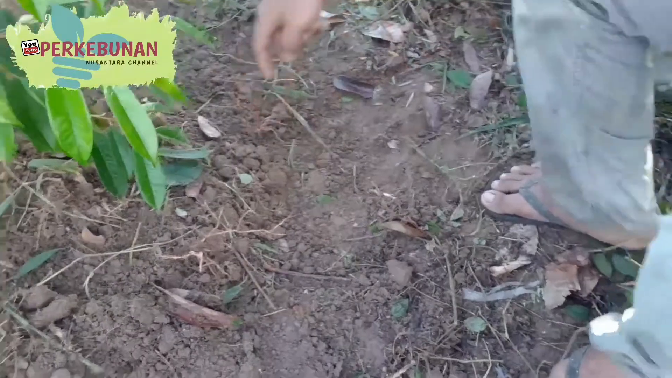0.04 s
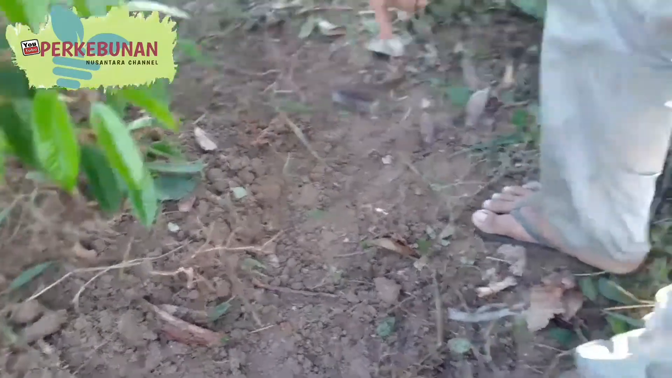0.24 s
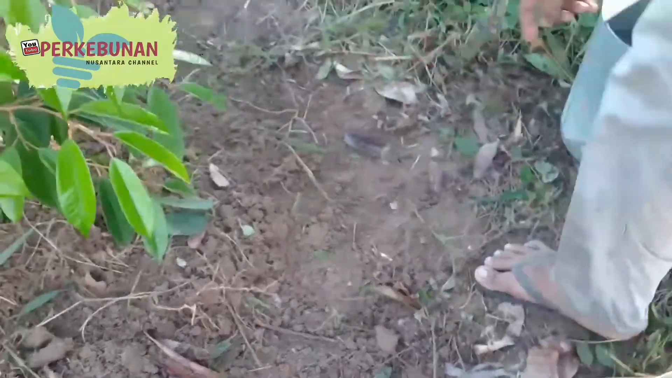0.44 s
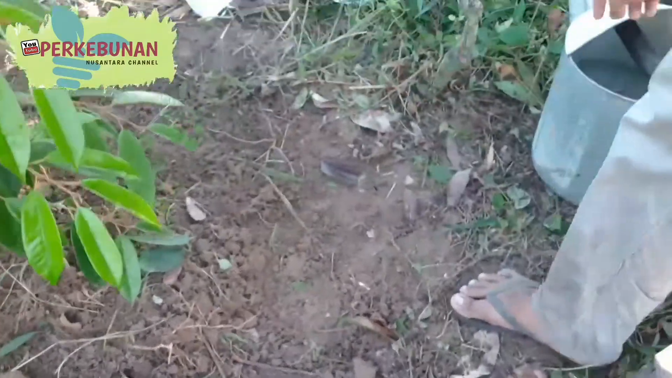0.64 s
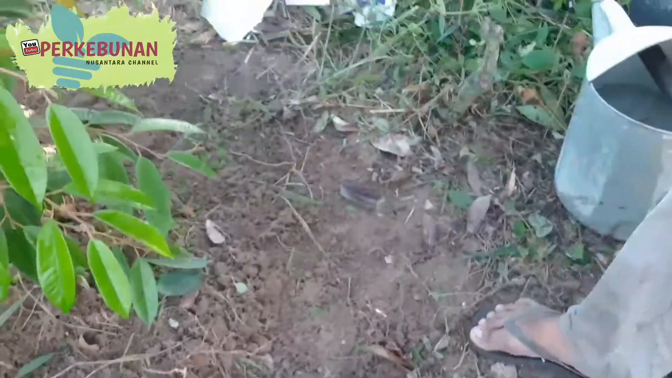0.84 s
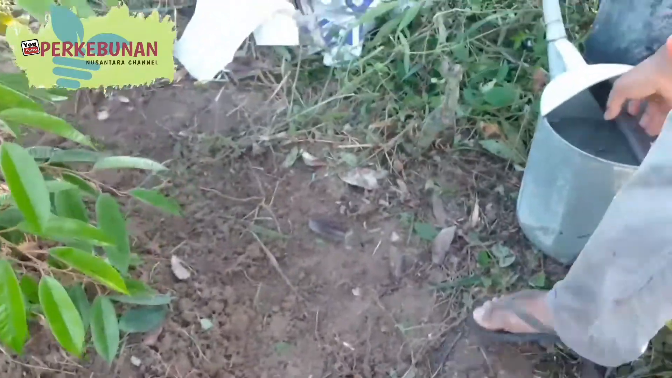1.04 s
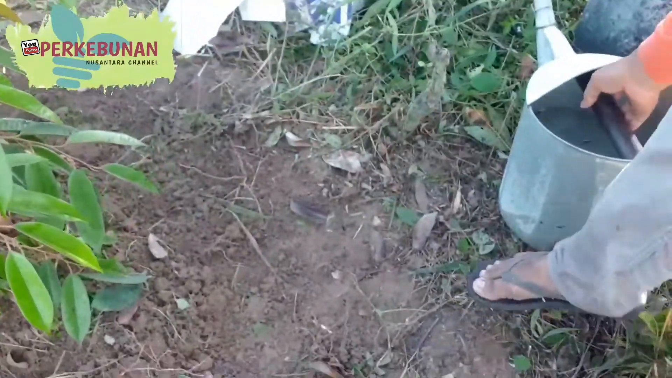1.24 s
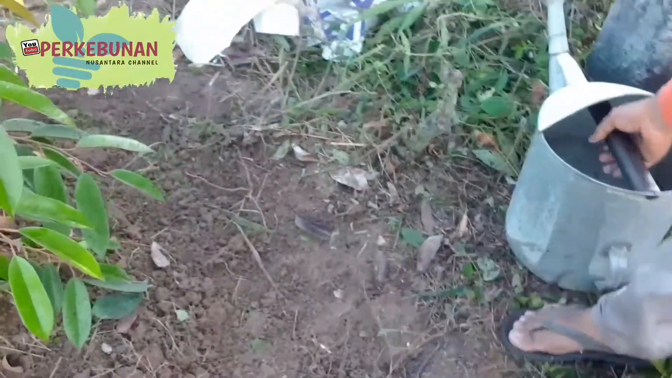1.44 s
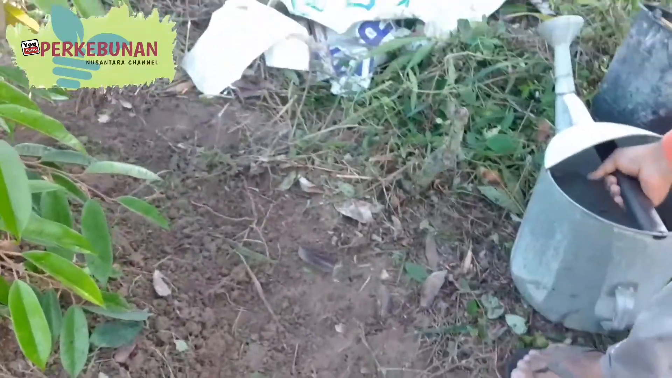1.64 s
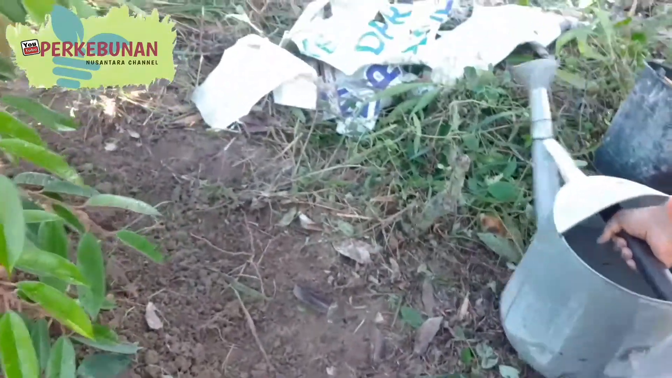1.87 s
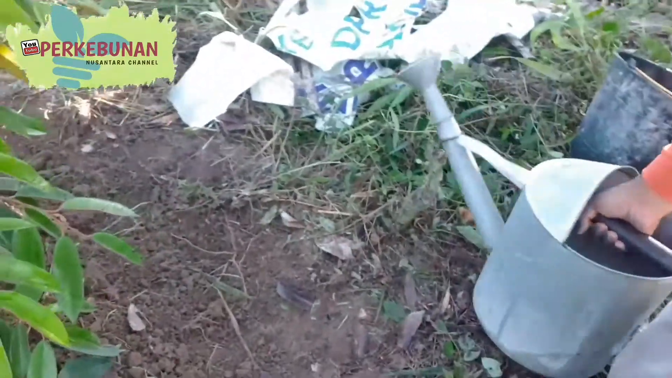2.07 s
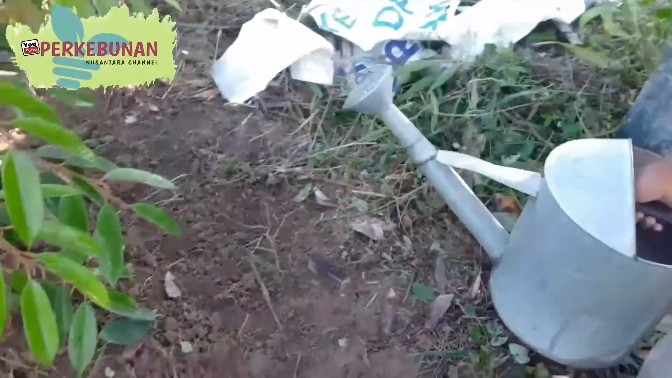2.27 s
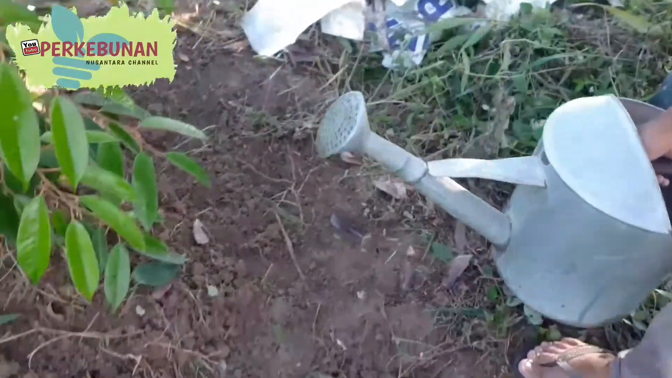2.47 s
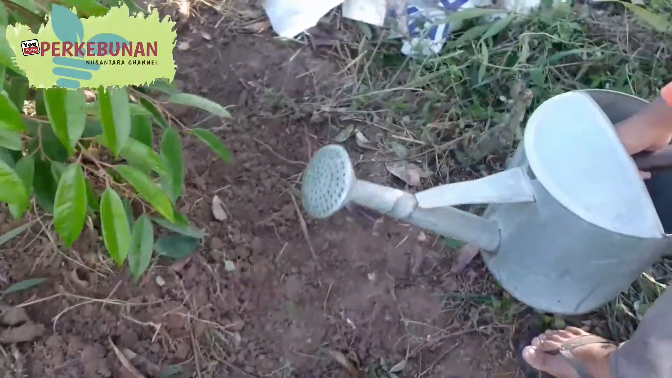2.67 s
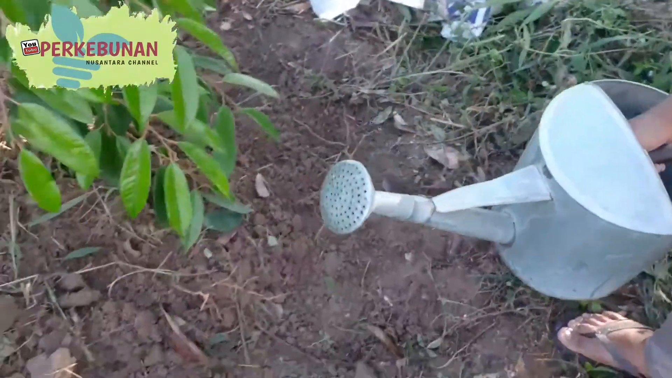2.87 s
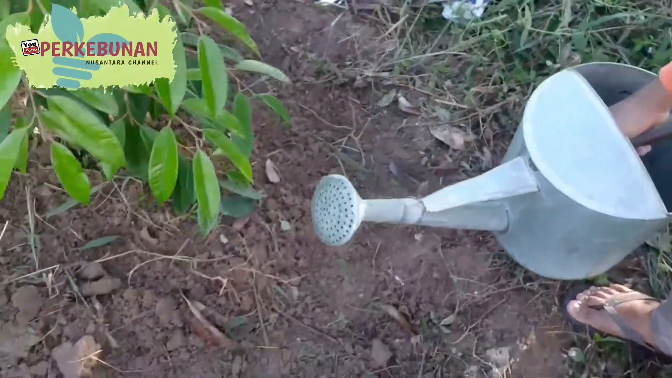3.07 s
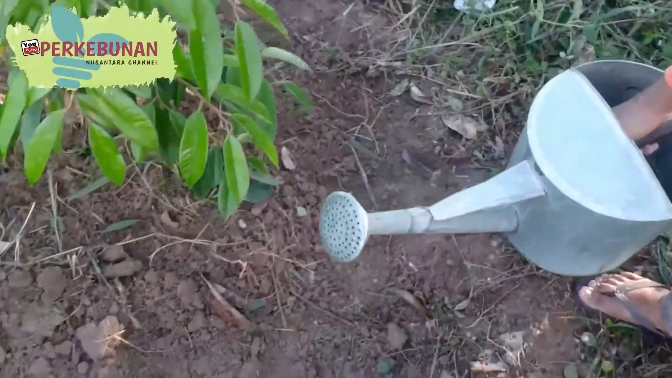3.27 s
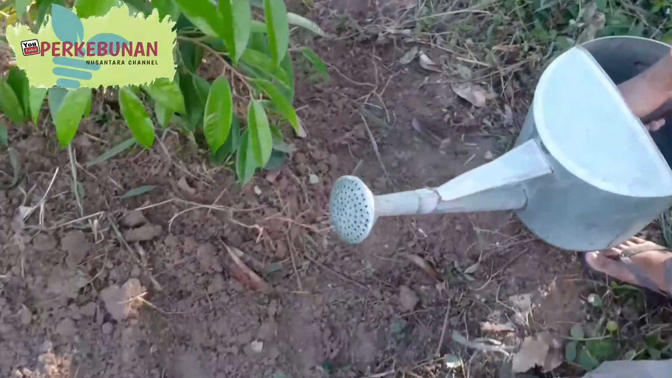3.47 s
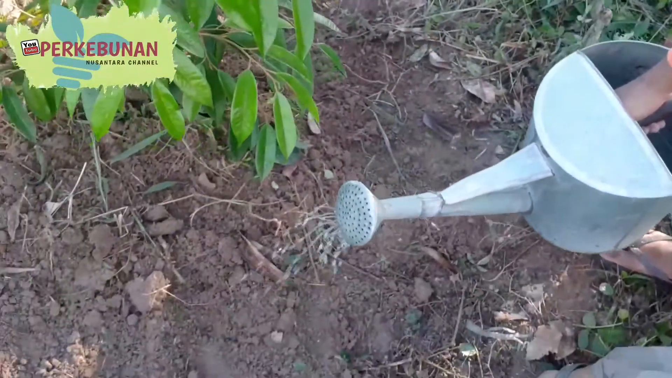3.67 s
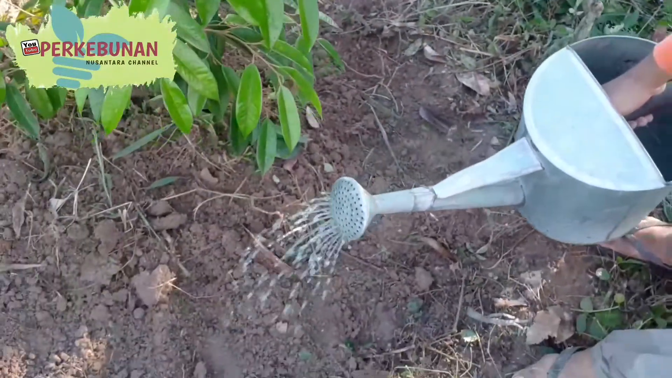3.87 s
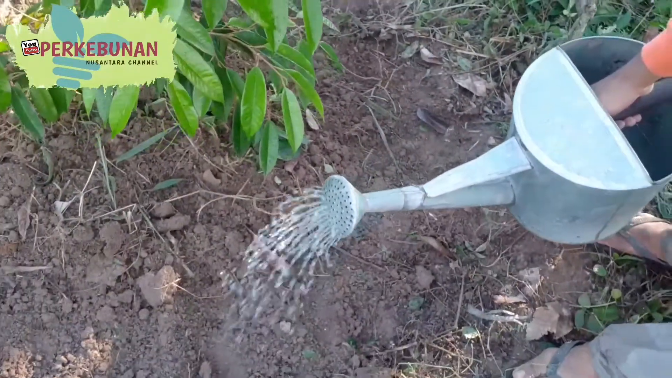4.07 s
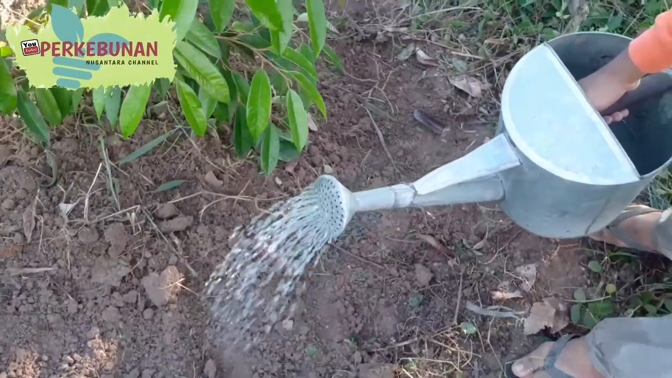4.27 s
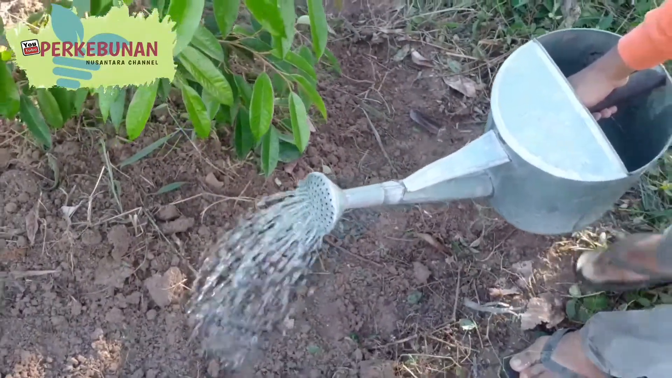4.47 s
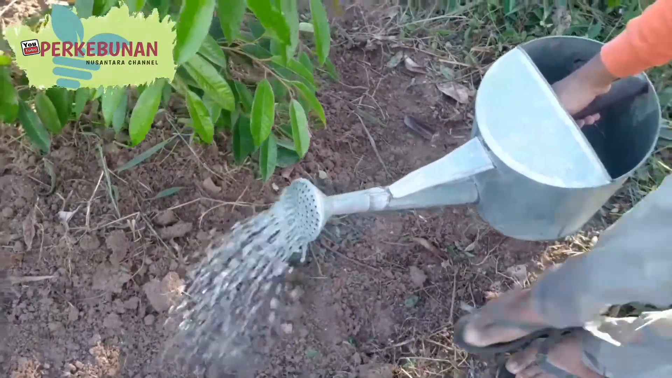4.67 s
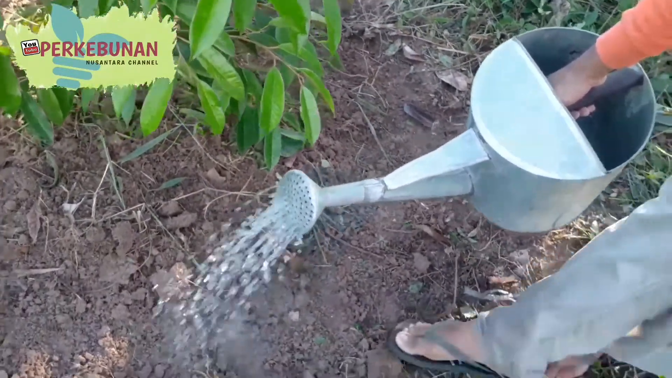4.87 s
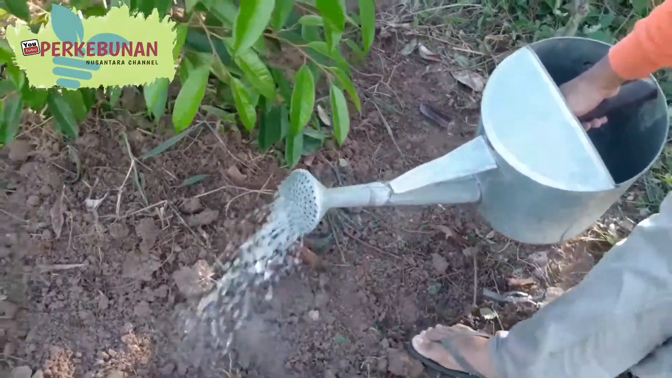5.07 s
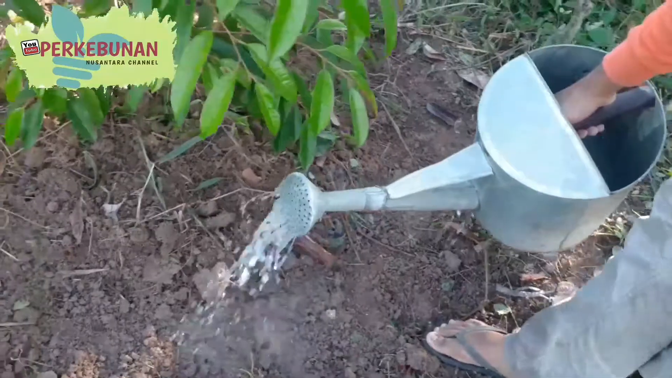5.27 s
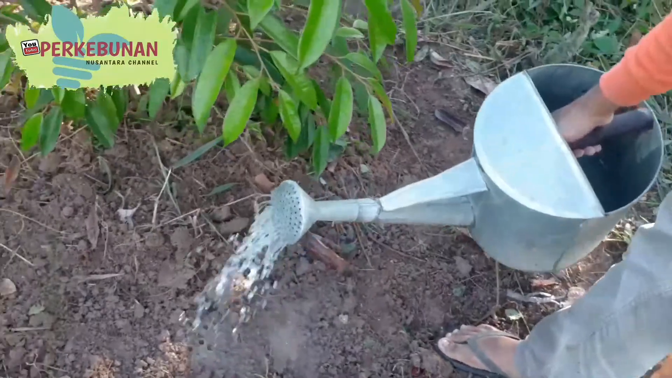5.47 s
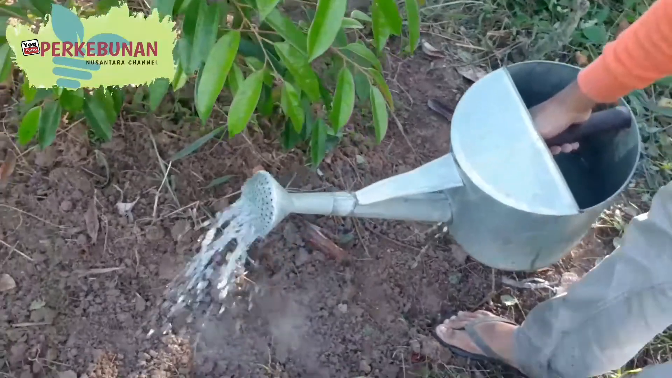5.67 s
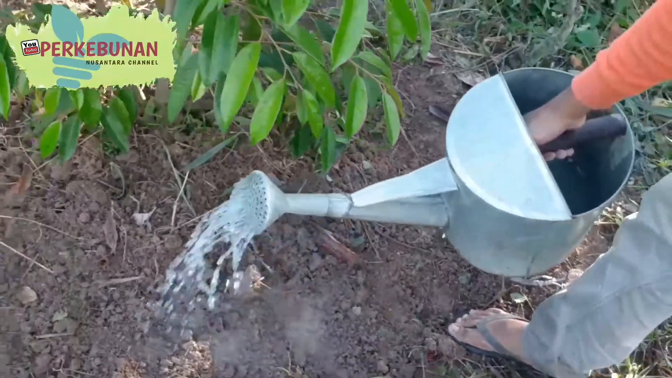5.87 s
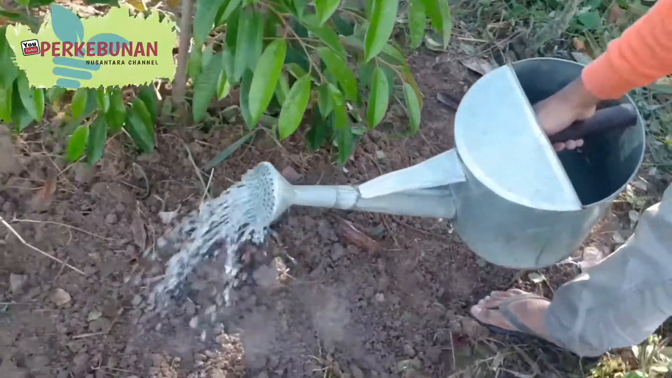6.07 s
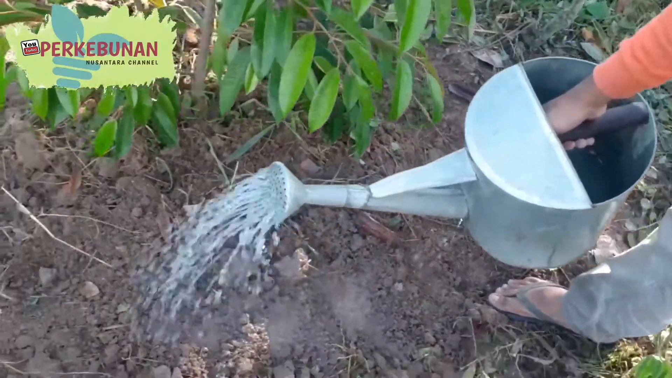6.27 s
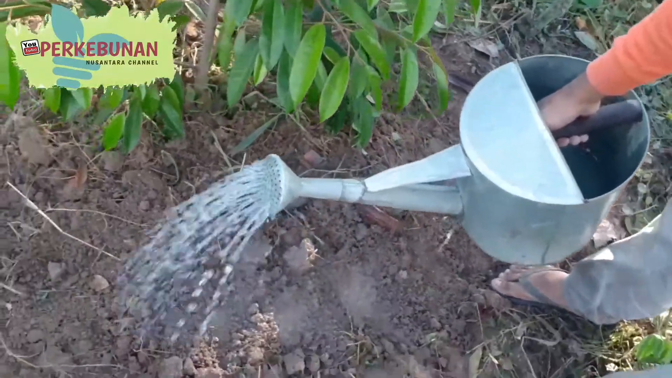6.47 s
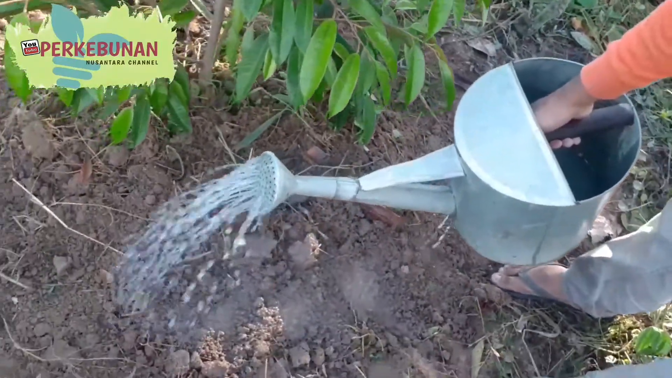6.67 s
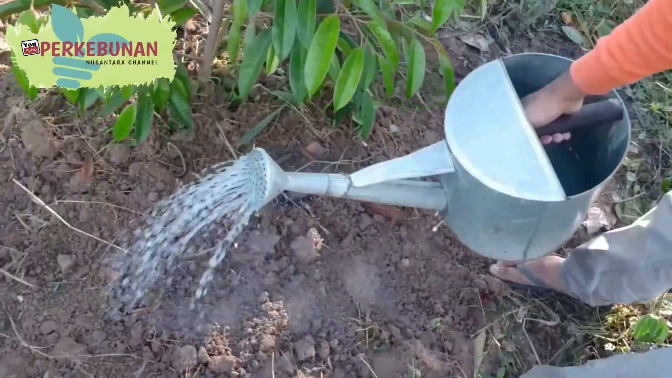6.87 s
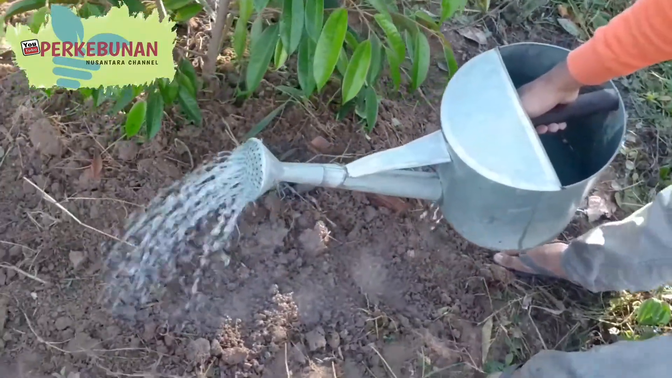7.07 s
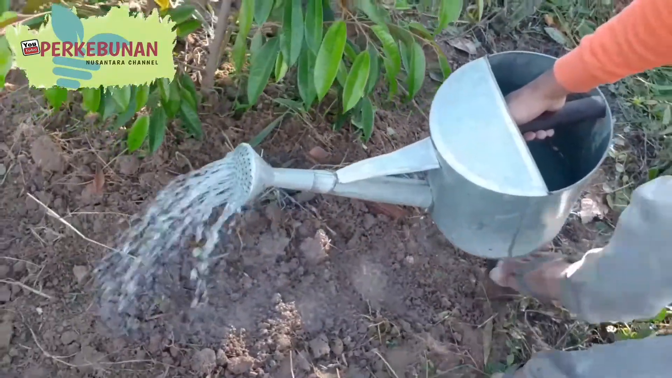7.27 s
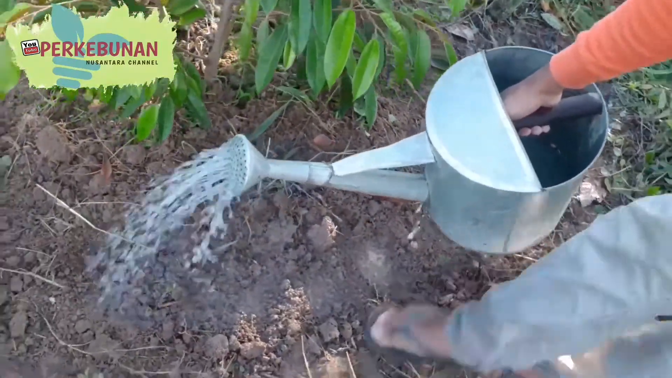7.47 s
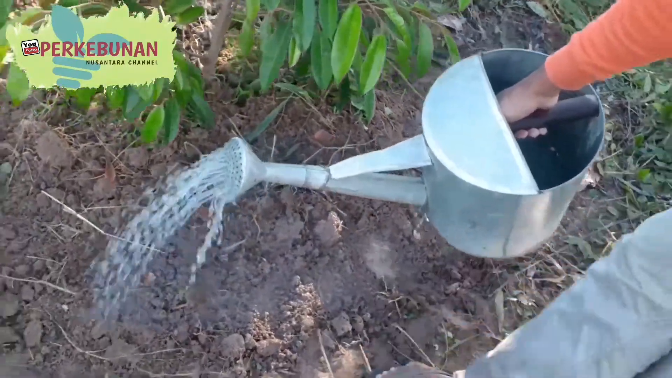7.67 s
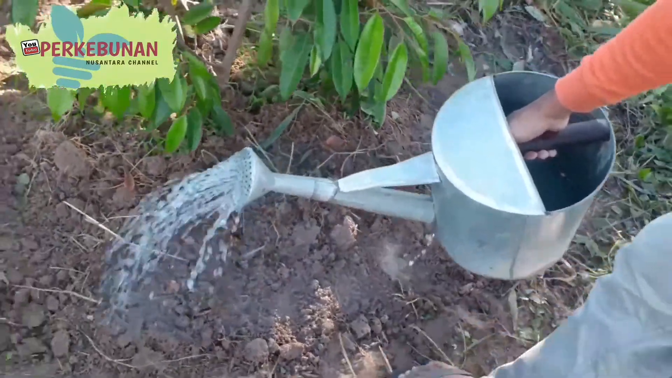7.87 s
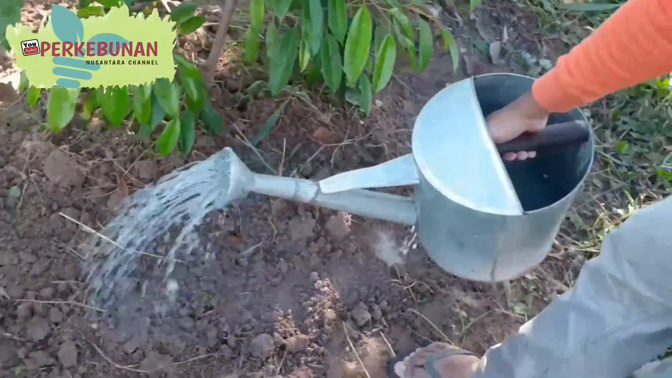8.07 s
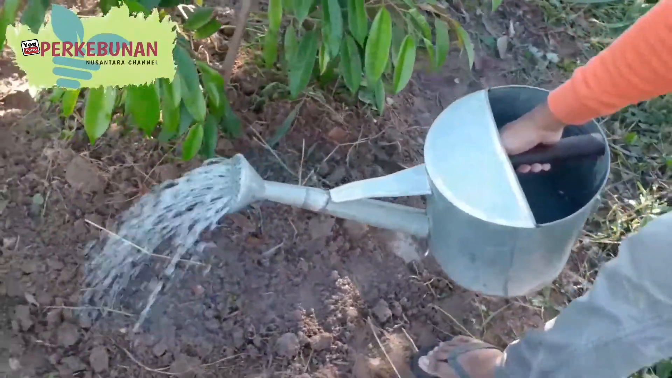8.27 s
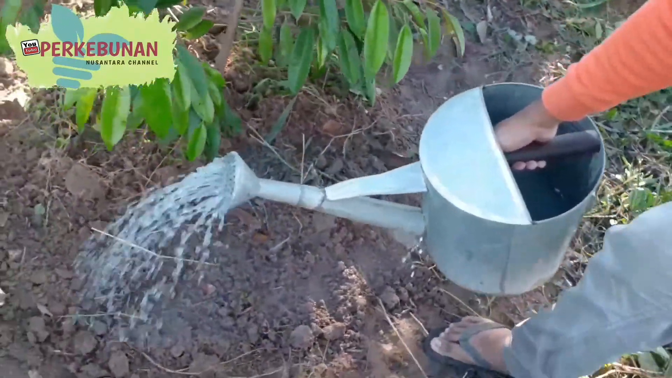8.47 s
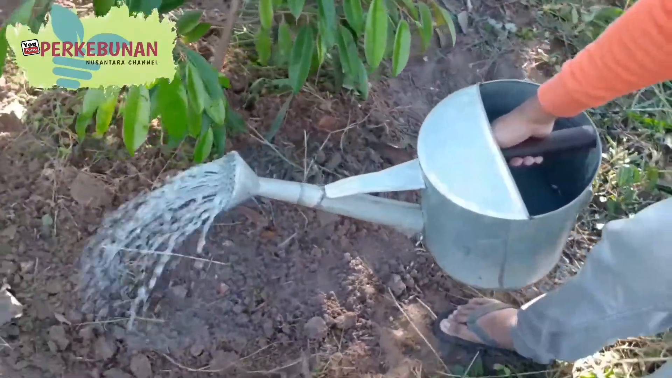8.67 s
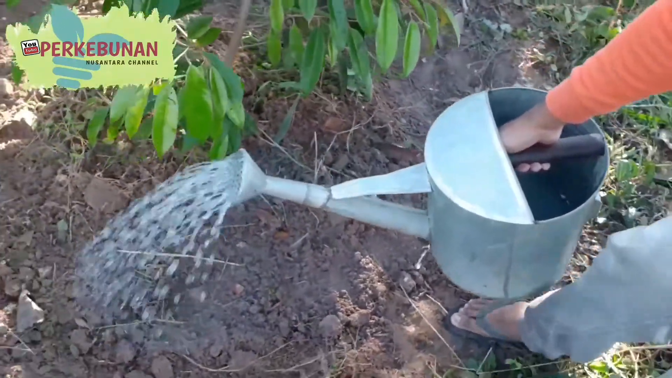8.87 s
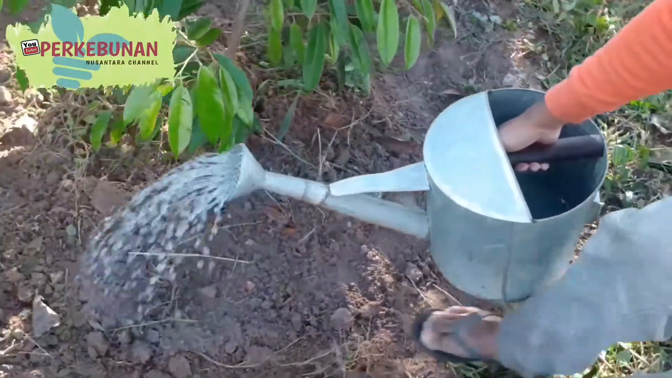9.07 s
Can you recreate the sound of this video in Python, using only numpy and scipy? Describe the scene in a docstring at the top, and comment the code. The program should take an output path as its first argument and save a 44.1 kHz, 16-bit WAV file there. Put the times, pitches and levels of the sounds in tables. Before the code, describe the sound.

Outdoors, insects trill and a far bird hoots evenly while sandals scuff dry litter, a metal can booms, then water sprinkles and patters onto soil.

```python
"""Watering bare soil

A metal watering can is carried over dry ground, booms as its water sways, and is tipped to sprinkle soil.
The spray is noise ticks and ringing bubbles, fat drops are noise bursts; sandals scuff and crack the litter.
The can is a bank of bending modes. Insects trill as swept wing strokes, and thin chirps fall in pitch;
a far bird repeats one hollow, nearly pure hoot."""
import sys
import numpy as np
from scipy import signal
from scipy.fft import rfft, irfft, next_fast_len
from scipy.io import wavfile
from scipy.ndimage import uniform_filter1d

SR = 44100
rng = np.random.default_rng(int(sys.argv[2]) if len(sys.argv) > 2 else 0)


def file_out(sig):
    """Save sig as 16-bit WAV at sys.argv[1]."""
    # one column per channel
    cols = np.atleast_2d(sig).T
    # limit, then scale
    lim = np.clip(cols, -1, 1)
    pcm = np.round(lim * 32767).astype(np.int16)
    wavfile.write(sys.argv[1], SR, pcm)


N = 403074
TIME = np.arange(N) / SR

# Levels in the tables are relative: most layers add gains of their own.
# Spectrum of the open air: freq_hz [Hz], density_db [dB per Hz]
AIR = [(25, -29), (45, -5), (85, 1), (130, 4), (220, -11), (400, -16.5), (800, -23), (2000, -38),
       (7000, -19), (12000, -15.5), (15500, -12.5)]
# Spectrum of the far insect chorus: freq_hz [Hz], density_db [dB per Hz]
CHORUS = [(2000, -21.5), (2700, -13), (3300, -7.5), (4050, -7.5), (4550, 6.5), (5200, 4.5), (5650, -2),
          (6050, 10), (6500, 3), (7000, -4), (8000, -32), (10000, -62)]
# Trilling insects: time_s [s], near_cricket_db [dB], lower_cricket_db [dB], far_chorus_db [dB]
TRILLS = [(0, -49, -52, -43.5), (2.1, -51.5, -49.5, -40.5), (2.8, -48.5, -51, -44.5),
          (3.35, -44.5, -46.5, -43), (4.7, -48.5, -53.5, -39.5), (8.15, -44, -44.5, -47.5),
          (8.55, -46.5, -41, -38.5), (9.14, -39, -41, -41)]
# Buzzes of a bush cricket: start_s [s], end_s [s], level_db [dB]
BUZZES = [(-.4, 0.053, -57.5), (.27, .46, -59), (0.471, .91, -56.5), (1.353, 1.88, -60),
          (2.164, 2.717, -59), (3.066, 3.612, -55.5), (3.983, 4.54, -54)]
# Falling calls of the nearer small birds: time_s [s], level_db [dB], pitch_hz [Hz]
CHIRPS = [(.44, -49, 2940), (.86, -50, 2930), (.93, -54, 2820), (0.989, -51, 2950), (1.72, -53, 3570),
          (2.08, -52, 2800), (2.39, -48, 3630), (3.54, -47, 3240), (3.98, -46, 3020), (4.196, -45, 2610),
          (4.235, -47, 2510)]
# Runs of the far bird's hoots: start_s [s], end_s [s], beat_s [s], first_db [dB], last_db [dB]
HOOT_RUNS = [(.003, 4.5, .4403, -49, -43.5), (4.882, 6.8, .452, -45.5, -47.5),
             (7.113, 9, .4385, -46.5, -47.5)]
# Low thumps: time_s [s], level_db [dB]
BUMPS = [(1.01, -33), (1.09, -43.5), (1.207, -39.5), (1.232, -37.5), (1.331, -45.5), (1.429, -47),
         (1.636, -46.5)]
# Steps and brushing cloth: time_s [s], half_length_s [s], grit_db [dB], swish_db [dB]
SCUFFS = [(0.518, 0.032, -51, -44), (0.72, 0.023, -53, -38.5), (0.775, 0.021, -53, -43),
          (0.916, 0.079, -57.5, -48.5), (1.162, 0.045, -46, -46.5), (1.461, 0.027, -64, -45),
          (1.553, 0.11, -58, -46), (1.929, 0.085, -48, -47), (2.571, 0.029, -52.5, -46),
          (2.694, 0.062, -52, -50.5), (2.77, 0.014, -50, -49), (2.818, 0.016, -48, -53),
          (2.866, 0.05, -58, -64), (3.749, .04, -52.5, -52), (4.76, 0.06, -47.5, -43),
          (5.002, 0.19, -53, -56), (5.88, 0.059, -49, -67), (7.405, 0.071, -47, -61),
          (7.746, 0.15, -45, -58), (8.21, 0.16, -42, -43.5), (8.45, 0.027, -46, -35.5)]
# Spectrum of ground crumbs: freq_hz [Hz], density_db [dB per Hz]
GRIT = [(30, -49), (110, -0.5), (250, -5.5), (500, -5), (1000, -5), (1600, -8), (3000, -3), (8000, -16.5)]
# Spectrum of brushing cloth and grass: freq_hz [Hz], density_db [dB per Hz]
SWISH = [(800, -6), (2200, -11.5), (3600, 3.5), (5500, 3.5), (8000, -1), (12000, -2.5), (15500, -11)]
# Spectrum of snapping leaves: freq_hz [Hz], density_db [dB per Hz]
LITTER = [(1200, -0.5), (2200, -24), (4000, 5.5), (7000, -11), (12000, -10)]
# Knocks of clods, twigs and gouts of water: time_s [s], knock_db [dB], pitch_hz [Hz], crunch_db [dB]
CRACKS = [(1.11, -41, 920, -35), (1.1728, -36, 455, -15), (2.433, -35, 3340, -49),
          (2.846, -38.5, 1420, -37), (3.713, -37, 1090, -52), (4.792, -35, 740, -44),
          (5.3642, -25.5, 1890, -29), (5.501, -27.5, 1990, -23.5), (5.849, -31.5, 1910, -42),
          (6.835, -25.5, 2230, -29), (6.865, -38.5, 730, -36), (6.918, -31, 1470, -30),
          (6.94, -34.5, 830, -35), (7, -29, 1610, -54), (7.062, -34.5, 1640, -48), (7.648, -36.5, 760, -33),
          (7.904, -28, 1950, -42), (8.056, -30, 1630, -40), (8.096, -31.5, 1820, -42),
          (8.229, -21.5, 1820, -19), (8.315, -36, 900, -45), (8.427, -28, 1320, -30),
          (8.4365, -11, 1430, -17.5), (8.471, -32, 1910, -37)]
# Water swaying in the can: time_s [s], level_db [dB], rise_s [s], fall_s [s], favoured_mode_hz [Hz]
SWAYS = [(1.762, -35.3, 0.0043, 0.092, 863), (1.812, -36, 0.005, 0.053, 354),
         (1.985, -47.5, 0.013, 0.14, 350), (2.429, -57, 0.013, 0.074, 483),
         (2.557, -53, 0.0058, 0.038, 252), (2.755, -49.5, 0.004, 0.094, 443),
         (3.719, -62, 0.0097, 0.095, 394), (8.879, -41.5, 0.0068, 0.15, 255),
         (8.954, -36, 0.0063, 0.091, 322), (9.105, -43, 0.0089, 0.1, 340)]
# Modes of the can walls: mode_hz [Hz], width_hz [Hz], level_db [dB]
CAN = [(344, 17, 0.5), (320.4, 10, -9.5), (255.2, 26, -17.5), (385, 14, -12), (433, 18, -18.5),
       (485, 33, -14.5), (534, 14, -27), (594, 30, -35), (684, 22, -22), (857, 7.2, -19), (887, 15, -26),
       (1140, 21, -41)]
# Spells of low gurgling: time_s [s], half_length_s [s], level_db [dB]
GURGLES = [(4.795, 0.066, -55.5), (5.09, 0.21, -56.5), (6.895, 0.059, -62), (7.62, 0.23, -57.5),
           (8.185, 0.28, -57.5)]
# The pour builds as the can tips, then wavers with the hand: time_s [s], fine_spray_db [dB], patter_db [dB]
POUR = [(3.7, -57, -63), (3.85, -49.5, -48.5), (4.15, -47.5, -52.5), (4.55, -47, -47), (5, -40.5, -45.5),
        (5.37, -42, -38.5), (5.7, -45.5, -45), (5.9, -42, -39.5), (6.17, -46, -47.5), (6.4, -43.5, -43),
        (6.66, -42, -48.5), (6.92, -39.5, -40.5), (7.35, -41, -42), (7.65, -38, -42), (8.25, -41.5, -41.5),
        (8.75, -41.5, -46.5), (9.13, -39.5, -43)]
# Spectrum of drops on soil: freq_hz [Hz], density_db [dB per Hz]
SOIL = [(300, -28), (600, -14.5), (1100, -22.5), (2000, -10), (3000, -2.5), (4000, 3.5), (5500, 0.5),
        (7000, -2), (8200, -6), (12000, -4), (15500, -4.5)]
# Left-right likeness of drops on the ground: freq_hz [Hz], correlation [-1 to 1]
LIKENESS = [(300, 0.3), (1200, 0.51), (2800, 0.4), (4500, 0.54), (6000, 0.47), (7500, 0.79), (15000, 0.62)]
# The fattest drops: time_s [s], level_db [dB], pitch_hz [Hz], width_octaves [octaves], length_s [s]
SPLATS = [(4.518, -35, 3660, 0.44, .0016), (4.859, -26, 10900, 0.82, 0.00085),
          (4.991, -29.5, 3600, 1.4, .0009), (5.039, -26, 4520, 0.76, 0.0015),
          (5.1215, -25, 3400, .35, .0012), (5.138, -33, 3850, .4, .0012),
          (5.2394, -34.5, 2620, 0.34, .0014), (5.322, -32, 4800, .9, .005),
          (5.347, -25.5, 3700, 0.46, .0015), (5.397, -30.5, 3200, 0.8, 0.0056),
          (5.442, -28, 3950, 0.57, 0.0017), (5.467, -33, 3950, 0.3, .0011), (5.525, -24, 4940, .35, .0018),
          (5.6015, -33, 3600, .7, 0.0035), (5.726, -34, 3750, 0.34, 0.0021), (5.7673, -33, 6300, .9, .0011),
          (5.8493, -26.5, 4700, 1.7, 0.0015), (5.925, -32, 5600, 1.5, .0008),
          (5.934, -33, 7250, 0.81, 0.00078), (6.021, -35, 3000, 0.41, .0013),
          (6.1449, -26.5, 10000, 1.3, 0.00097), (6.289, -31, 3300, 0.62, 0.0015),
          (6.39, -35.5, 2860, 0.51, 0.0012), (6.436, -30, 10000, 1.1, 0.00058),
          (6.5406, -34.5, 6700, 0.37, 0.0012), (6.783, -30, 7200, 1.3, 0.00099),
          (6.834, -22.5, 9500, 2.1, .0008), (6.8362, -26, 6500, 1.3, 0.0009),
          (6.865, -20.5, 9500, .9, .0008), (6.896, -32, 6400, 0.91, .0008),
          (6.9543, -28.5, 6600, 0.92, .0008), (6.964, -31, 5620, .6, 0.00074),
          (7.1277, -29.5, 6500, 0.89, .001), (7.178, -33, 3000, 0.55, .0018),
          (7.2156, -29.5, 6000, 0.91, 0.00079), (7.2216, -27.5, 4500, 0.38, 0.00087),
          (7.3933, -24.5, 9800, 1.4, 0.0011), (7.4044, -24, 14000, .4, .0007),
          (7.4415, -25, 7000, 1.6, 0.00059), (7.45, -26, 5800, 1.7, 0.0011),
          (7.503, -27, 5830, 0.41, 0.0016), (7.554, -28.5, 9400, 0.89, .0008),
          (7.6295, -24.5, 3850, .4, 0.0011), (7.76, -23, 4400, 0.37, .0013), (7.7654, -29, 5320, .3, .001),
          (7.879, -29, 5100, .5, 0.0014), (7.8893, -27, 4600, 1.1, .001), (7.962, -29.5, 6000, 0.69, .0008),
          (8.1894, -26, 4860, .8, 0.0017), (8.321, -26, 10600, 0.81, 0.00074),
          (8.4483, -27, 6600, 0.36, .0008), (8.485, -28, 4840, .7, .0015),
          (8.5297, -27, 7000, 0.42, 0.00063), (8.5435, -30.5, 7000, .8, 0.001),
          (8.8794, -25.5, 5600, .45, 0.00096), (8.895, -27.5, 10500, .7, 0.00076),
          (9.024, -24, 5200, .45, .0012)]

CUTOFF_HZ = 15700
HOOT_HZ, HOOT_TIRING_HZ_PER_S = 772.7, 1.2  # the pitch sinks as the bird goes on
BUMP_HZ, BUMP_T60_S = 94, 0.082
CRUNCH_S = 0.0027  # decay of the crumbs around a knock
KNOCK_S = 0.00087  # even the highest knock swells for this long
POUR_START_S = 3.7
PATCHY_DB = 2.2  # spread of the spray's flicker in each band
# Lesser fat drops fall at random, more often as the soil turns to mud.
STRAY_PER_S, STRAY_DB, STRAY_SPREAD_DB = 24, -35.5, 2.3
STRAY_HZ, STRAY_OCTAVES, STRAY_FEWEST_CYCLES = 5900, 0.65, 4
MUD_FROM_S, MUD_SOAK_S = 4.4, 1.8
LEFT_LAG_S = 0.00014  # lag of the falling water on the left, below about 7 kHz


def from_db(db):
    """Decibels express the logarithm of an amplitude ratio; this inverts it."""
    return 10 ** (np.asarray(db) / 20)


def rms_one(x):
    """Mean square measures power; scale it to one."""
    return x / np.sqrt(np.mean(x ** 2) + 1e-20)


def in_time(rows):
    """Linear interpolation gives one curve in time per column."""
    s, *columns = np.transpose(rows)
    return [np.interp(TIME, s, c) for c in columns]


def at_hz(points, hz):
    """Hearing spaces pitch by ratio, so a table is read on a log-frequency axis."""
    f, value = np.transpose(points)
    return np.interp(np.log(hz + 1e-3), np.log(f), value)


def bell(centre_s, half_s):
    """A Gaussian envelope swells and fades symmetrically."""
    return np.exp(-np.minimum(((TIME - centre_s) / half_s) ** 2, 60) / 2)


def pan(x, left_db):
    """A level difference between the ears leans a sound; positive is left."""
    return x * from_db(np.array([[.5], [-.5]]) * left_db)


def drift(rate_hz):
    """Low-passed white noise wanders slowly; the spread is 1."""
    step = 40  # samples between computed points
    r = np.exp(-2 * np.pi * rate_hz * step / SR)
    white = rng.standard_normal(N // step + 2002)
    slow = signal.lfilter([1], [1, -2 * r, r * r], white)[2000:]
    return np.interp(np.arange(N) / step, np.arange(len(slow)), rms_one(slow))


def pair(two, alike):
    """Sum and difference of two unrelated signals give ears of a chosen correlation."""
    alike = np.clip(alike, -.98, .98)
    common = np.sqrt(1 + alike) * two[0]
    opposed = np.sqrt(1 - alike) * two[1] * np.array([[1], [-1]])
    return (common + opposed) / np.sqrt(2)


def noise(spectrum, alike):
    """White noise weighted in the frequency domain takes on a colour."""
    size = next_fast_len(N)
    white = rfft(pair(rng.standard_normal((2, size)), alike))
    gain = from_db(at_hz(spectrum, np.fft.rfftfreq(size, 1 / SR)))
    return rms_one(irfft(white * gain, size)[:, :N])


def resonate(x, hz, width_hz):
    """A pole pair near the unit circle is a damped resonance, with gain 1 on top."""
    r = np.exp(-np.pi * width_hz / SR)
    zeros = np.array([1, 0, -1]) * (1 - r * r) / 2
    poles = [1, -2 * r * np.cos(2 * np.pi * hz / SR), r * r]
    return signal.lfilter(zeros, poles, x + 1e-18)


def band(x, low_hz, high_hz):
    """A Butterworth band-pass is smooth in its pass band."""
    edges = [low_hz, min(high_hz, .48 * SR)]
    return signal.sosfilt(signal.butter(2, edges, "band", fs=SR, output="sos"), x + 1e-18)


def add(out, s, sound):
    """Superposition: mix a short sound in at time s."""
    i = max(int(s * SR), 0)
    out[:, i:i + sound.shape[-1]] += sound[..., :N - i]


def scatter(x, t60):
    """Many small reflections form an exponentially dying cloud, different for each ear."""
    t = TIME[:int(t60 * SR)]
    cloud = rng.standard_normal((2, len(t))) * from_db(-60 * t / t60)
    cloud /= np.sqrt((cloud ** 2).sum(1, keepdims=True))
    return signal.oaconvolve(np.atleast_2d(x), cloud, axes=1)[:, :N]


def air():
    """The open air is steady coloured noise, largely alike at both ears."""
    return from_db(-54.5) * noise(AIR, 0.77)


def stridulate(hz, strokes_per_s, sweep_hz, sharp, waver_hz):
    """Stridulation: each wing stroke is a brief tone whose pitch slides."""
    stroke = np.cumsum(strokes_per_s) / SR % 1
    pitch = hz + sweep_hz * (.5 - stroke) + waver_hz * drift(196.4)
    return rms_one(np.sin(np.pi * stroke) ** (2 * sharp) * np.sin(2 * np.pi * np.cumsum(pitch) / SR))


def insects():
    """Stroke trains, resonant noise and coloured noise: two crickets, a buzzing bush cricket, a far chorus."""
    near_db, lower_db, chorus_db = in_time(TRILLS)
    near = stridulate(6270, 76 + .5 * drift(2), sweep_hz=-500, sharp=2.8, waver_hz=150.9)
    near = from_db(near_db) * rms_one(near + from_db(-2.0) * scatter(near, t60=.08))
    lower = resonate(resonate(rng.standard_normal((2, N)), 4535, 180), 4535, 180)
    lower = from_db(lower_db) * rms_one(lower)
    # the bush cricket swells, slows and stops in turns
    swell, age = np.zeros(N), np.zeros(N)
    for start, end, db in BUZZES:
        on = (TIME > start) & (TIME < end)
        age[on] = TIME[on] - start
        swell[on] = from_db(db) * (1 - np.exp(-age[on] / 0.095))
    buzz_hz = 9200 - 260 * np.exp(-age / 0.17)
    buzz = swell * stridulate(buzz_hz, 122 - 16 * age, sweep_hz=600, sharp=0.43, waver_hz=113.0)
    buzz = buzz + from_db(-7) * scatter(buzz, t60=.15)
    chorus = from_db(chorus_db + 1.67 * drift(20.0)) * noise(CHORUS, -0.13)
    return pan(near, -11.0) + pan(lower, -1.0) + from_db(5.0) * pan(buzz, -2.0) + pan(chorus, -3.5)


def small_birds(call_s=0.015, fall_hz_per_s=5500, twitter_db=-57.5, twitter_spread_db=5):
    """Falling frequency sweeps chirp, blurred by the trees, among constant fainter twittering."""
    out, t = np.zeros((1, N)), TIME[:SR // 8] - 1 / 16
    chance = rng.uniform([.1, -1, 2700], [9, 1, 3800], size=(220, 3))
    twitter = [(s, twitter_db + twitter_spread_db * loud, hz) for s, loud, hz in chance]
    for s, db, hz in [*CHIRPS, *twitter]:
        wobble = np.cumsum(rng.normal(0, 0.06, len(t)))
        fall = fall_hz_per_s * rng.uniform(.3, 1.9)
        tone = np.sin(2 * np.pi * (hz * t - fall * t * t / 2) + wobble)
        add(out, s + t[0], from_db(db) * tone * np.exp(-(t / call_s) ** 2 / 2))
    return 0.6 * out + 0.8 * scatter(out, t60=.2)


def hoots(uneven_db=0.8, uneven_hz=3):
    """Periodic calling: an even beat within each run sets time, level and pitch of each hoot."""
    rows = []
    for start, end, beat, first_db, last_db in HOOT_RUNS:
        for s in np.arange(start, end, beat):
            db = np.interp(s, [start, end], [first_db, last_db]) + uneven_db * rng.standard_normal()
            hz = HOOT_HZ - HOOT_TIRING_HZ_PER_S * s + uneven_hz * rng.standard_normal()
            rows.append((s, db, hz))
    return rows


def bird(note_s=0.015, sag_hz_per_s=250, cloud_db=-11, echo_db=-14):
    """A nearly pure tone sags in pitch, never twice the same, with delayed echoes from the trees."""
    out = np.zeros((2, N))
    for s, db, hz in hoots():
        t = TIME[:SR // 5] - min(s, .1)
        waver = np.cumsum(rng.normal(0, 0.023, len(t)))
        tone = np.sin(2 * np.pi * (hz * t - sag_hz_per_s * t * t / 2) + waver)
        swell = np.exp(-np.abs(t / (note_s * rng.uniform(.85, 1.15))) ** 2.5 / 2.5)
        add(out, s + t[0], from_db(db) * tone * swell)
    late = np.roll(out[0], int(.055 * SR))
    return pan(out + from_db(echo_db) * late + from_db(cloud_db) * scatter(out[0], t60=.4), -2.4)


def bumps():
    """Low damped oscillations thump dully, mostly on the left."""
    out, t = np.zeros((2, N)), TIME[:SR // 4]
    for s, db in BUMPS:
        swell = (1 - np.exp(-t / 0.0024)) * from_db(db - 60 * t / BUMP_T60_S)
        add(out, s, pan(np.sin(2 * np.pi * BUMP_HZ * t) * swell, 22.0))
    return out


def litter(press, snaps_per_s=400, size_db=3.0, level_db=-7):
    """Brittle fracture: dry leaves and stalks snap under a step, each with a colour of its own."""
    edges = np.geomspace(900, 15500, 6)
    at = np.flatnonzero(rng.random(N) < snaps_per_s / SR)
    sizes = from_db(size_db * np.minimum(rng.exponential(1, len(at)), 3.5))
    out = np.zeros((2, N))
    for low, high in zip(edges, edges[1:]):
        snaps = np.zeros((2, N))
        snaps[:, at] = pair(rng.standard_normal((2, len(at))), 0.78) * sizes
        out += band(snaps, low, high) * from_db(at_hz(LITTER, np.sqrt(low * high)))
    return from_db(level_db) * press * rms_one(out + scatter(out, t60=0.0082))


def feet():
    """Friction and impact: sandals grind crumbs, cloth and grass swish, clods, twigs and gouts knock."""
    grit, swish = np.zeros(N), np.zeros(N)
    for s, half, grit_db, swish_db in SCUFFS:
        press = bell(s, half)
        grit += from_db(grit_db) * press
        swish += from_db(swish_db) * press
    crumble = rms_one(from_db(4 * drift(200) + 2 * drift(25)))
    brush = rms_one(from_db(4 * drift(300) + 3 * drift(45)))
    grinding = crumble * grit * noise(GRIT, 0.16)
    swishing = brush * swish * noise(SWISH, 0.12)
    out = pan(grinding + swishing + litter(swish), -0.46)
    t = TIME[:2000]
    for s, db, hz, crunch_db in CRACKS:
        age = t / max(0.98 / hz, KNOCK_S)
        knock = from_db(db) * np.sin(2 * np.pi * hz * t) * age ** 2 * np.exp(2 - 2 * age)
        crumbs = pair(rng.standard_normal((2, len(t))), 0.13) * np.exp(-t / CRUNCH_S)
        add(out, s, pan(knock + from_db(crunch_db) * band(crumbs, 320, 5200), -2.0))
    return out


def can(wobble_share=0.033, wobble_hz=7.74, favour_db=12, favour_octaves=0.13,
        flicker_db=2.5, rush_db=-21, damping_db_per_s_octave=90):
    """Modal vibration: swaying water shakes the thin walls and bends their modes; high ones die first."""
    out, t = np.zeros((2, N)), TIME[:SR]
    for s, db, rise, fall, favoured_hz in SWAYS:
        wash = wobble_hz * rng.uniform(.7, 1.3) * t + rng.random()
        bend = 1 + wobble_share * np.sin(2 * np.pi * wash)
        boom = np.zeros((2, len(t)))
        for hz, width, mode_db in CAN:
            # random phase steps broaden a mode to its width
            jitter = rng.standard_normal(len(t)) * np.sqrt(2 * np.pi * width / SR)
            phase = np.cumsum(2 * np.pi * hz * bend / SR + jitter)
            favour = favour_db * np.exp(-(np.log2(hz / favoured_hz) / favour_octaves) ** 2)
            flicker = flicker_db * np.interp(t, np.linspace(0, 1, 40), rng.standard_normal(40))
            damping = damping_db_per_s_octave * t * max(np.log2(hz / CAN[0][0]), 0)
            tone = np.sin(phase + np.array([[0], [rng.normal(0, 0.55)]]))
            boom += tone * from_db(mode_db + favour + flicker - damping)
        rush = rms_one(band(pair(rng.standard_normal((2, len(t))), 0.39), 120, 760))
        swell = (1 - np.exp(-t / rise)) * np.exp(-t / fall)
        boom = band((rms_one(boom) + from_db(rush_db) * rush) * swell, 100, 1050)
        loudest = np.sqrt(uniform_filter1d(np.mean(boom ** 2, axis=0), size=2500).max())
        add(out, s, boom / loudest * from_db(db))
    return out


def gurgles(per_s=170, cycles=2.8, rise=0.06, size_db=3.0, low_hz=205, high_hz=950):
    """Short damped tones rise a little and blur into low, lumpy glugs of water."""
    out, t = np.zeros((2, N)), TIME[:SR // 12]
    for when, pitch, size, apart in rng.random((int(per_s * N / SR), 4)):
        hz = low_hz * (high_hz / low_hz) ** (pitch ** 0.75)
        age = t * hz / cycles
        phase = 2 * np.pi * hz * t * (1 + rise * np.minimum(age, 2) / 2)
        glug = np.sin(phase + np.array([[0], [2 * apart - 1]])) * np.exp(-age) * (1 - np.exp(-t * hz))
        add(out, when * N / SR, glug * from_db(size_db * np.minimum(-np.log(size + 1e-9), 2.5)))
    swell = sum(from_db(db) * bell(s, half) for s, half, db in GURGLES)
    return swell * rms_one(out + scatter(out, t60=.1))


def water_db(hz, fine_db, patter_db):
    """Drop size sets the spectrum: heavy drops govern the middle, fine ones the top."""
    fine = np.interp(hz, [3500, 9000], [0, 1])
    return fine * (fine_db + 10.0) + (1 - fine) * (patter_db + 8.5) + at_hz(SOIL, hz)


def drops(per_s, size_db, clump_db):
    """A random point process whose rate drifts: jets break into clumps of drops of chance size."""
    flow = np.clip((TIME - POUR_START_S) / .8, 0, 1)
    at = np.flatnonzero(rng.random(N) < flow * per_s * from_db(clump_db * drift(30)) / SR)
    return at, from_db(size_db * np.minimum(rng.exponential(1, len(at)), 4.3))


def bubbles(life_s=0.001, rise=0.014, level_db=-8.0):
    """Bubble resonance: air in the wet crumbs bursts with a few cycles; small bubbles die sooner."""
    fine_db, patter_db = in_time(POUR)
    at, sizes = drops(per_s=1100, size_db=3.5, clump_db=3.0)
    out, t = np.zeros((2, N)), TIME[:350]
    pitches = 1200 + 14300 * rng.random(len(at)) ** 1.32
    for i, size, hz in zip(at, sizes, pitches):
        life = life_s * rng.uniform(.3, 1.5) * (6000 / hz) ** .3
        apart = np.arccos(np.clip(at_hz(LIKENESS, hz), -1, 1)) * rng.normal(0, 0.83)
        phase = 2 * np.pi * hz * t * (1 + rise * np.minimum(t / life, 4) / 4)
        ring = np.sin(phase + np.array([[0], [apart]])) * np.exp(-t / life) * (1 - np.exp(-t * hz))
        gain = size * from_db(level_db + water_db(hz, fine_db[i], patter_db[i]))
        add(out, i / SR, pan(ring, rng.normal(-6.0, 2.1)) * gain)
    return out


def plops(per_s=150, cycles=1.9, level_db=-2, lowest_hz=700, octaves=3.1, size_db=2.6):
    """Heavily damped oscillation: heavier drops slap the mud for a few cycles at any middle pitch."""
    fine_db, patter_db = in_time(POUR)
    at, sizes = drops(per_s, size_db, clump_db=4.0)
    out, t = np.zeros((2, N)), TIME[:1200]
    pitches = lowest_hz * 2 ** (octaves * rng.random(len(at)) ** 0.71)
    for i, size, hz in zip(at, sizes, pitches):
        age = t * hz / cycles
        tone = np.sin(2 * np.pi * hz * t + np.array([[0], [rng.normal(0, 0.93)]]))
        gain = size * from_db(level_db + water_db(hz, fine_db[i], patter_db[i]))
        add(out, i / SR, tone * age * np.exp(1 - age) * gain)
    return out


def stray_drops():
    """Chance arrivals grow with soaking: rows like the fattest drops, from ticks to soft splashes."""
    chance = rng.random((300, 4))
    level, pitch = np.clip(rng.standard_normal((2, len(chance))), -2, 1.5)
    s = chance[:, 0] * N / SR
    mud = np.clip((s - MUD_FROM_S) / MUD_SOAK_S, 0, 1)
    db = STRAY_DB + STRAY_SPREAD_DB * level
    hz = STRAY_HZ * 2 ** (STRAY_OCTAVES * pitch)
    cycles = STRAY_FEWEST_CYCLES * 5 ** chance[:, 3]
    rows = np.transpose([s, db, hz, .3 + .7 * chance[:, 2], cycles / hz])
    return list(rows[chance[:, 1] < mud * STRAY_PER_S * N / SR / len(chance)])


def splats(skirt_db=-12, wet_db=-20, wet_s=.004, level_db=0.5, left_db=-1.8, spread_db=1.2):
    """Impact noise: fat drops smack sharp and broad on crumbs, round and longer in puddles."""
    out, t = np.zeros((2, N)), TIME[:900]
    for s, db, hz, octaves, length in [*SPLATS, *stray_drops()]:
        swell = t / length * np.exp(1 - 2 * t / length) + from_db(wet_db) * np.exp(-t / wet_s)
        burst = pair(rng.standard_normal((2, len(t))), .7) * swell
        half = 2 ** (octaves / 2)
        core = rms_one(band(burst, hz / half, hz * half))
        skirt = rms_one(band(burst, hz / 3, hz * 2))
        smack = core + from_db(skirt_db) * skirt
        smack = smack / np.sqrt(np.mean(smack[:, :SR // 200] ** 2))  # unit power over the first 5 ms
        add(out, s, pan(smack, left_db + spread_db * rng.standard_normal()) * from_db(db + level_db))
    return out


def spray(colour_db=1.5, mist_db=-12, splash_db=-1.0, crown_s=0.008, level_db=-4.5):
    """Impulsive impact: each drop bursts into ticks of its own colour; tiny droplets merge to a hiss."""
    pour = in_time(POUR)
    at, sizes = drops(per_s=800, size_db=2.7, clump_db=3.0)
    edges = np.geomspace(280, 17000, 13)
    out = np.zeros((2, N))
    for low, high in zip(edges, edges[1:]):
        hz = np.sqrt(low * high)
        alike = at_hz(LIKENESS, hz)
        strength = sizes * from_db(colour_db * np.clip(rng.standard_normal(len(at)), -2, 1.5))
        # a drop flattens on the crumbs over about a millisecond
        delays = rng.triangular(0, 25, 70, (4, len(at))).astype(int)  # samples
        ticks = np.zeros((2, N))
        for touch in np.minimum(at + delays, N - 1):
            ticks[:, touch] += pair(rng.standard_normal((2, len(at))), alike) * strength
        ticks = rms_one(ticks)
        # each impact throws up a crown that falls back within a few milliseconds
        fall = np.exp(-1 / (crown_s * SR))
        crown = signal.lfilter([1 - fall], [1, -fall], ticks[0] ** 2 + ticks[1] ** 2 + 1e-18) / 2
        hiss_gain = np.sqrt(from_db(splash_db) ** 2 * crown + from_db(mist_db) ** 2)
        hiss = pair(rng.standard_normal((2, N)), alike) * hiss_gain
        gain = from_db(level_db + water_db(hz, *pour) + PATCHY_DB * drift(17.3))
        out += band(ticks + hiss, low, high) * gain
    return pan(out, -0.52) * np.clip((TIME - POUR_START_S) / 0.11, 0, 1)


def off_centre(x):
    """Phase shift: below about 7 kHz the left lags the right slightly; above, it is a full cycle."""
    size = next_fast_len(N)
    cycles = np.minimum(np.fft.rfftfreq(size, 1 / SR) * LEFT_LAG_S, 1)
    left = irfft(rfft(x[0], size) * np.exp(-2j * np.pi * cycles), size)[:N]
    return np.array([left, x[1]])


def scene():
    """Superposition of all sources; those near the ground scatter faintly from leaves and soil."""
    water = off_centre(spray() + bubbles() + plops() + splats())
    close = water + gurgles() + feet()
    around = from_db(-15) * scatter(close, t60=.06)
    return close + around + can() + bumps() + bird() + small_birds() + insects() + air()


def record(dry):
    """An elliptic low-pass cuts the top steeply."""
    return signal.sosfilt(signal.ellip(10, .1, 70, CUTOFF_HZ, fs=SR, output="sos"), dry)


dry = scene()
out = record(dry)
file_out(out)
```